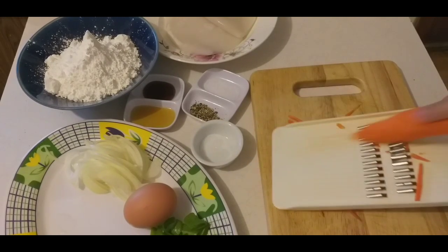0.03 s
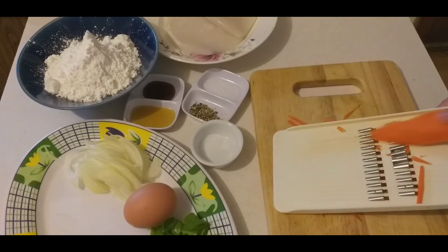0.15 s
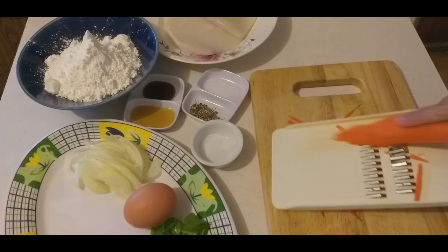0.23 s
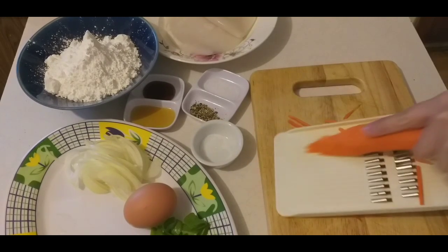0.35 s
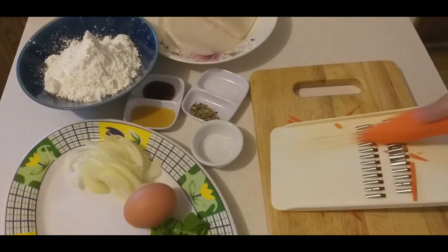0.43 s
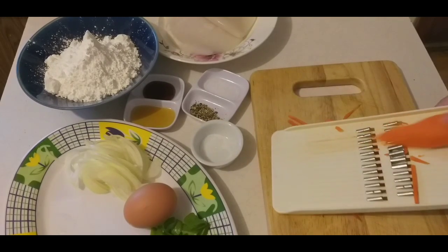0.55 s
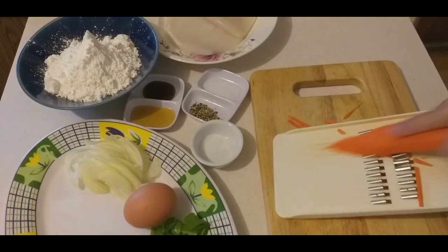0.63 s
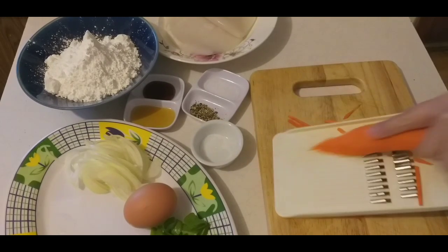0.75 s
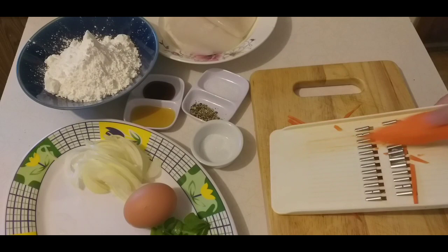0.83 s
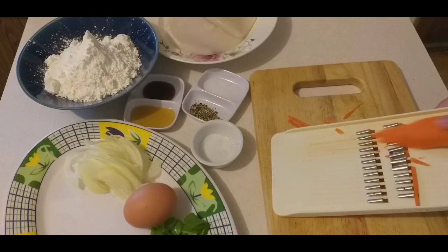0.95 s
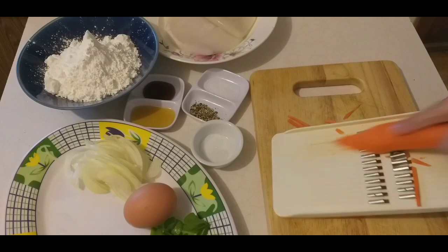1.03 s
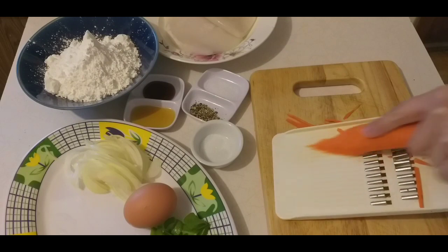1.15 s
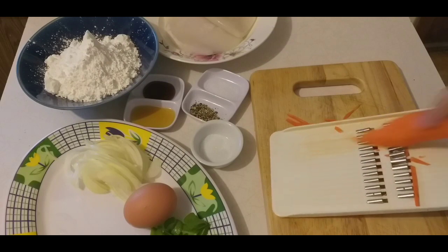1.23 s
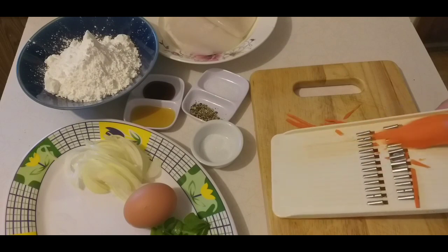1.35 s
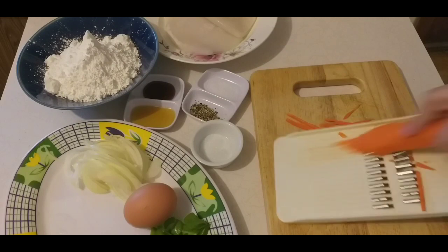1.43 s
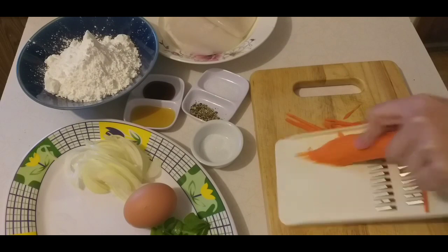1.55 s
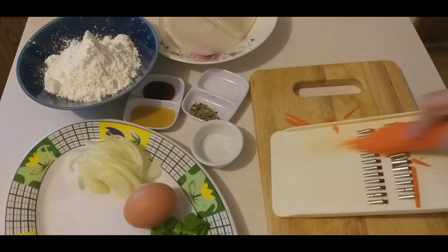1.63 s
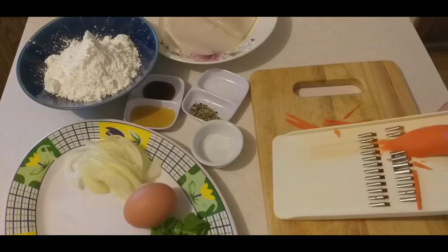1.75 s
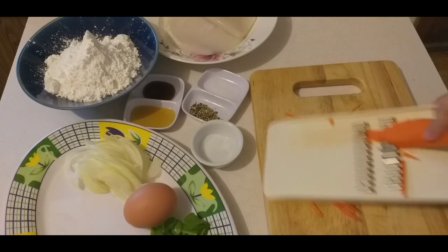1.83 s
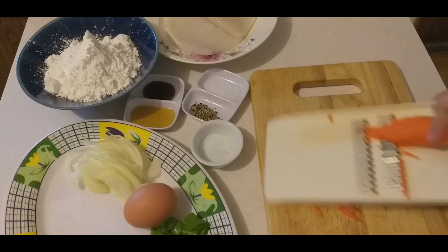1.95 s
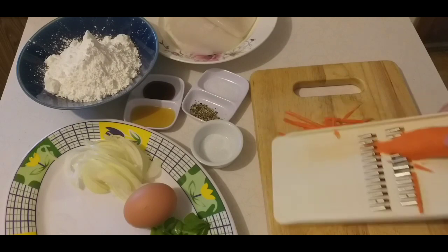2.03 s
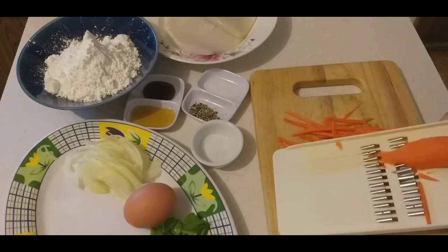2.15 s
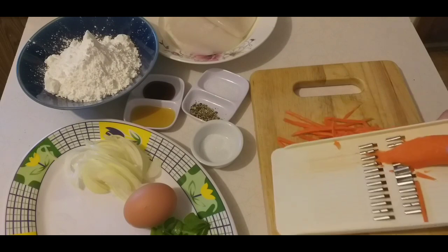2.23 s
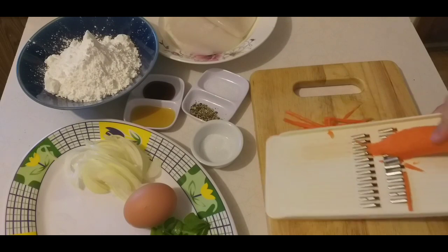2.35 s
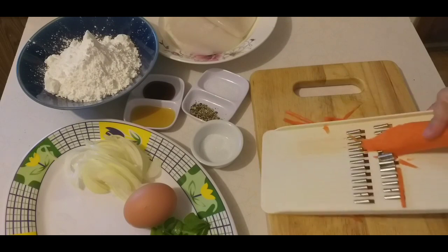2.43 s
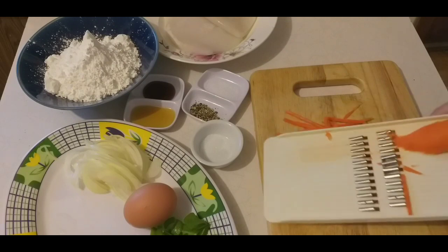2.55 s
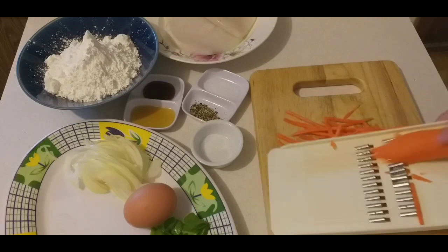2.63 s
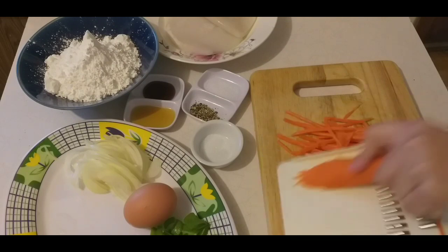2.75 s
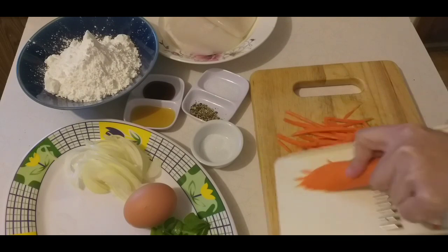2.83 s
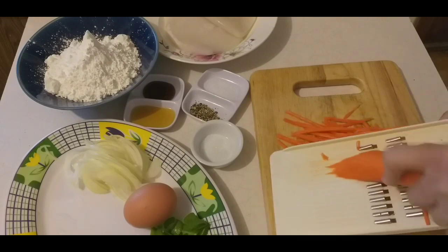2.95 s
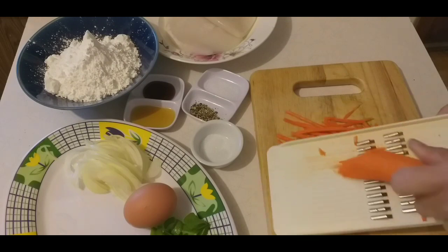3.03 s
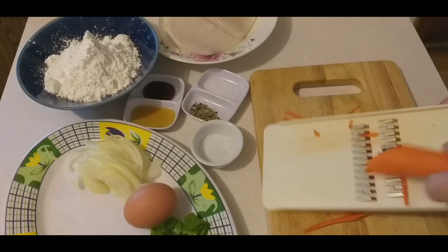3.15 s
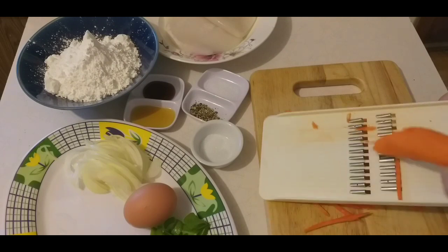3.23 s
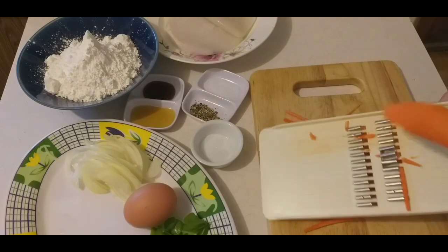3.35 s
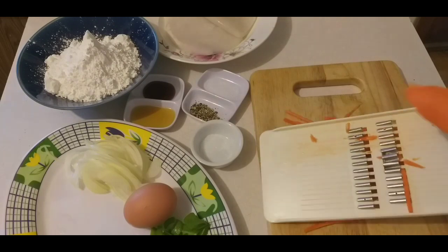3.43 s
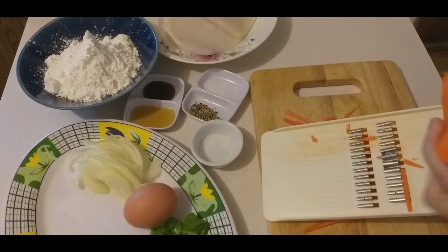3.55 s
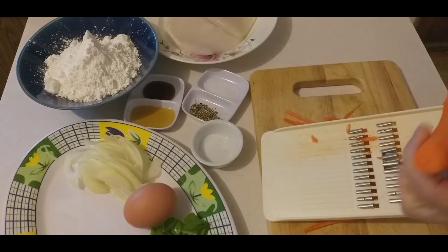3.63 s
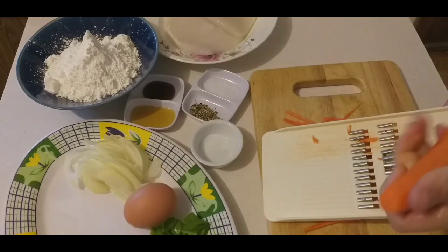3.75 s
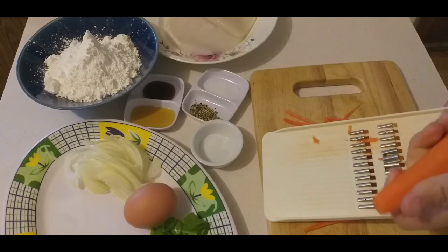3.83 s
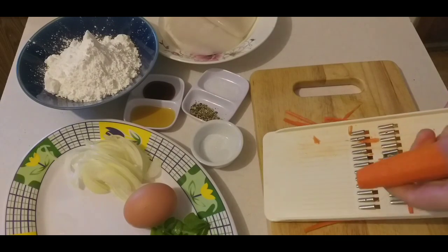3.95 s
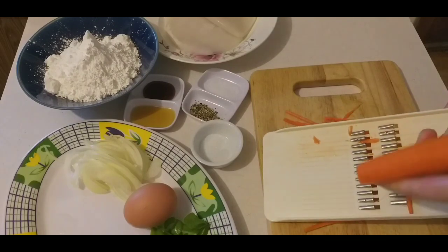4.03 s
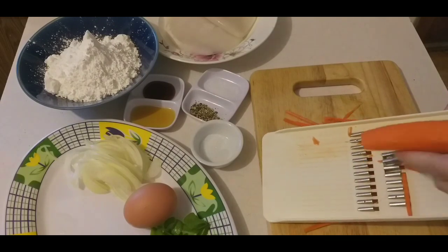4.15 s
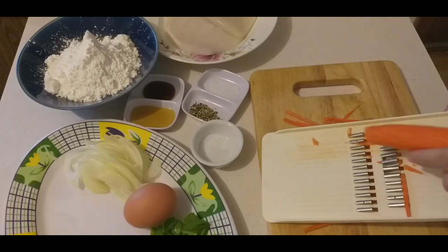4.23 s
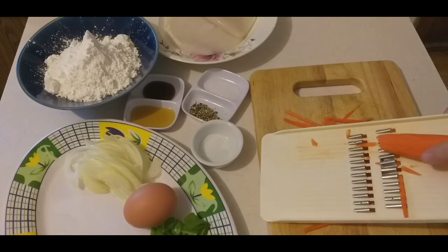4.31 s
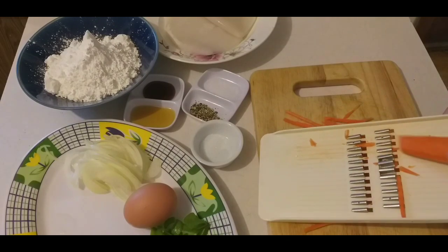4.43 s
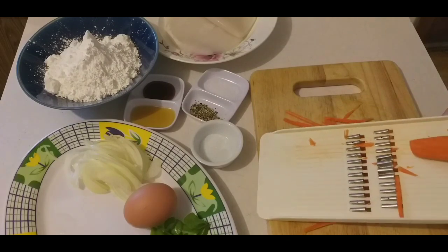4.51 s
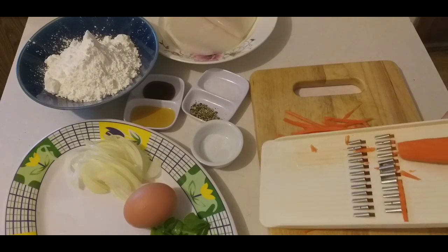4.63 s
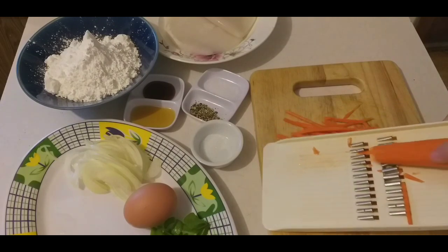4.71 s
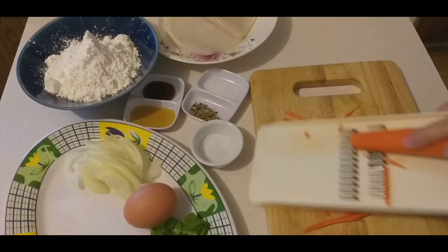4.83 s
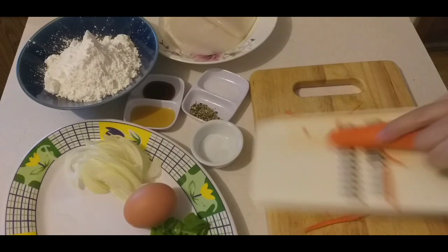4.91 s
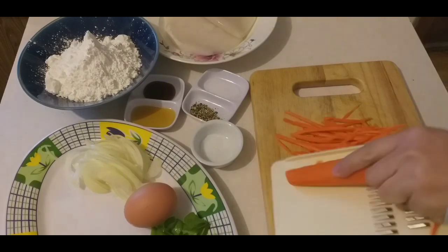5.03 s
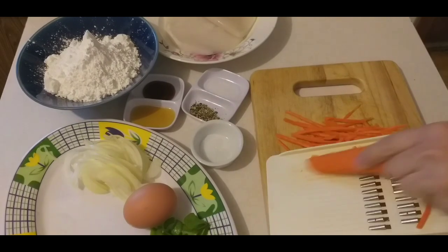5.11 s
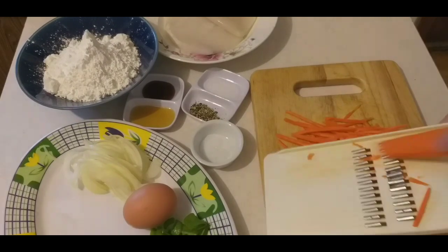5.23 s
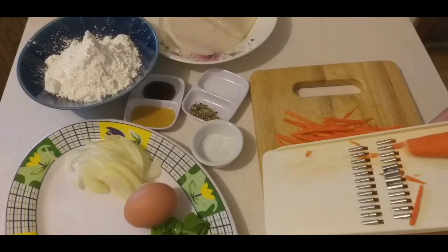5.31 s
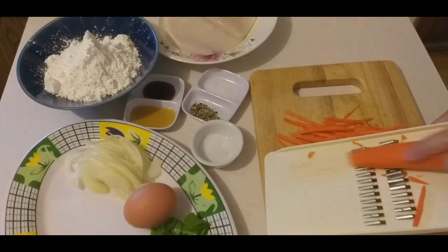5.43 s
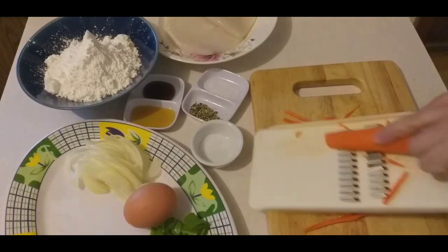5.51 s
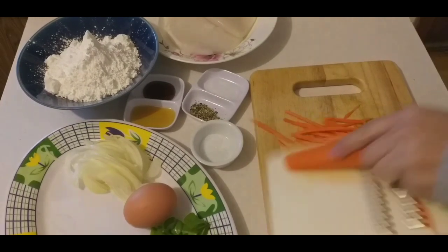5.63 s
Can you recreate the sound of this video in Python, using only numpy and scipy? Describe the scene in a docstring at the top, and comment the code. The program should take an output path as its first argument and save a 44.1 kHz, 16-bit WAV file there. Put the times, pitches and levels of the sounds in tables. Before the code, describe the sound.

A raw carrot is shredded on a plastic slicer with steel teeth, close to a stereo microphone in a small kitchen. Each push is a dense, crisp crunch with a low judder, with soft slides, ticks and taps between. In a pause come two faint squeaks and a dull knock as the slicer is set on a wooden board. A few shorter pushes follow, over a faint appliance hum.

```python
"""A small kitchen, a stereo microphone close to a plastic slicer on a wooden board, a faint appliance hum.
A raw carrot is pushed over the steel teeth, each push a dense crunch of bursting cells with a low
stick-slip judder; between pushes it slides back softly, flicks the teeth and taps the plate.
In a pause from 3 s its damp skin squeaks twice, and near 4.4 s the slicer is set down on the board.
From 4.7 s a few shorter pushes follow."""
import sys
import numpy as np
from scipy import signal
from scipy.fft import rfft, irfft, next_fast_len
from scipy.io import wavfile
from scipy.ndimage import uniform_filter1d, map_coordinates

SR = 44100
rng = np.random.default_rng(int(sys.argv[2]) if len(sys.argv) > 2 else 0)


def dump_mix(stems):
    """Bounce the given channels to the path in sys.argv[1] as a 16-bit WAV at rate SR."""
    frames = np.atleast_2d(stems).T  # one column per channel
    limited = np.clip(frames, -1, 1)  # hard clip at full scale
    pcm = np.round(limited * 32767).astype(np.int16)
    wavfile.write(sys.argv[1], SR, pcm)


N = 250488

# resonances of the plastic plate: f/Hz, width/Hz, level/dB
PLATE_MODES = [(887, 160, -17), (1077, 45, -0.5), (1160, 56, -3.5), (1324, 84, -17), (1594, 140, -2.5),
               (1722, 130, 0), (1881, 61, -6.5), (2089, 120, -6), (2468, 390, -8.5), (2760, 91, -4),
               (3410, 170, -9.5)]
# resonances of the slicer on the board: f/Hz, width/Hz, level/dB
BOARD_MODES = [(164, 130, -6), (324, 55, 1), (440, 120, -7), (589.6, 41, -6)]
# spectrum of carrot rasping on the teeth: f/Hz, level/dB
CRUNCH_SPECTRUM = [(1650, -42.5), (2800, -11), (3220, -8.5), (4240, -3), (4600, 0.5), (5930, -0.5),
                   (8180, 2), (9060, 2), (9960, -5.5), (13000, -0.5), (15100, -10.5), (16000, -9.5)]


def amp(db):
    """Decibels to gain."""
    return 10 ** (np.asarray(db) / 20)


def unit(x):
    """Scale to rms 1."""
    return x / np.sqrt(np.mean(x ** 2) + 1e-20)


def along(points, hz):
    """Points of f/Hz, value read on a log frequency axis."""
    f, values = np.transpose(points)
    return np.interp(np.log(hz + 1), np.log(f + 1), values)


def clock():
    """The time of every sample."""
    return np.arange(N) / SR


def wobble(rate):
    """A smooth random curve, rate knots a second."""
    return map_coordinates(rng.standard_normal(int(N * rate / SR) + 4), [clock() * rate])


def filtered(x, response):
    """x through a complex frequency response."""
    size = next_fast_len(N + SR // 2)
    return irfft(rfft(x, size) * response(np.fft.rfftfreq(size, 1 / SR)), size)[..., :N]


def rolled_off(x, order, hz, kind):
    """x through a high-pass or low-pass filter."""
    return signal.sosfilt(signal.butter(order, hz, kind, fs=SR, output='sos'), x)


def coloured(x, spectrum):
    """x shaped by a spectrum of f/Hz, level/dB points."""
    return filtered(x, lambda hz: amp(along(spectrum, hz)))


def rung(x, modes):
    """x through a body's resonances, which alternate in sign."""
    return filtered(x, lambda f: sum((-1) ** k * amp(db) * 1j * f * width / (hz**2 - f**2 + 1j * f * width)
                                     for k, (hz, width, db) in enumerate(modes)))


def progress(start, length):
    """How far a stroke has got at every sample: 0 before it, 1 after it."""
    return np.clip((clock() - start) / length, 0, 1)


def swells(starts, lengths, levels_db, peaks, steepness):
    """Gain over a series of strokes: the pressure of each builds to one peak and lets go."""
    out = np.zeros(N)
    for start, length, db, peak in np.broadcast(starts, lengths, levels_db, np.clip(peaks, .1, .9)):
        u = progress(start, length)
        on = (u > 0) & (u < 1)
        from_peak = (u[on] - peak) / np.where(u[on] < peak, peak, 1 - peak)
        out[on] += amp(db) * np.abs(1 - from_peak ** 2) ** steepness
    return out


def room_tone():
    """Still air and a faint, slightly unsteady appliance hum."""
    # spectrum of the air: f/Hz, level/dB
    air_spectrum = [(15, -51.5), (25, -15), (200, -7), (301, -14), (489, -20), (818, -20.5), (1190, -26),
                    (1290, -24.5), (1790, -30.5), (16000, -35)]
    # tones of the appliance: f/Hz, level/dB
    hum_tones = [(199, -76), (297, -76), (359, -80)]
    hum = sum(amp(db) * np.sqrt(2) * np.sin(2 * np.pi * hz * clock() + 0.37 * wobble(3.5))
              for hz, db in hum_tones)
    return amp(-68.5) * unit(coloured(rng.standard_normal(N), air_spectrum)) + hum


def reflections(x, build_s=0.0027):
    """One tail off the hard walls; each frequency dies at its own speed."""
    # reverberation time of the kitchen: f/Hz, t60/s
    decay_times = [(200, 0.29), (600, 0.35), (1500, 0.31), (4000, 0.34), (8500, .4), (15000, 0.25)]
    hz, t, noise = signal.stft(rng.standard_normal(SR * 3 // 5), SR, nperseg=256)
    tail = signal.istft(noise * amp(-60 * t / along(decay_times, hz)[:, None]), SR, nperseg=256)[1]
    tail *= 1 - np.exp(-(np.arange(len(tail)) / SR / build_s) ** 2)
    return signal.fftconvolve(x, tail / np.linalg.norm(tail))


def kitchen(x, stretches=8):
    """Short kitchen reverberation, with a fresh tail for each stretch so that no one pitch keeps ringing."""
    out, step = np.zeros(N + 2 * SR), N // stretches + 1
    for at in range(0, N, step):
        answer = reflections(x[at:at + step])
        out[at:at + len(answer)] += answer
    return out[:N]


def scattered(x, t60):
    """x smeared by the small reflections around the microphone."""
    t = np.arange(SR // 50) / SR
    echoes = rng.standard_normal(len(t)) * amp(-60 * t / t60)
    return signal.fftconvolve(x, echoes / np.linalg.norm(echoes))[:N]


def board(x):
    """A brief blow on the slicer's feet rings the board's upper resonances more than its deep ones."""
    return rolled_off(rung(x, BOARD_MODES), 2, 430, 'high')


def plate(x):
    """The thin plate rings over a dense bed of damped modes, and radiates little bass."""
    bed = np.roll(rolled_off(x, 2, 3400, 'low'), SR // 1000)
    return rolled_off(rung(x, PLATE_MODES) + amp(-10) * bed, 3, 620, 'high')


def shifting(x, patchy_db):
    """The travelling carrot damps different teeth and parts of the plate, so resonances come and go."""
    spectra = signal.stft(x, nperseg=512)[2]
    patches = uniform_filter1d(rng.standard_normal(spectra.shape), size=6, axis=0)
    patches = uniform_filter1d(patches, size=8, axis=1)
    return unit(signal.istft(spectra * amp(patchy_db * unit(patches)), nperseg=512)[1][:N])


def fractures(per_second, spread_db):
    """Tiny random breaks of uneven size."""
    happens = rng.random(N) < per_second / SR
    return unit(happens * rng.choice([-1, 1], N) * amp(spread_db * rng.standard_normal(N)))


def squeaks():
    """Damp skin rubbing on plastic holds one narrow resonance, shakes the board and, weakly, the plate."""
    # soft squeaks: start/s, end/s, f/Hz, level/dB
    rubs = [(3.162, 3.292, 1363, -65), (3.352, 3.442, 1178, -58.5)]
    out = np.zeros(N)
    for start, end, hz, db in rubs:
        u = progress(start, end - start)
        swell = np.sqrt(4 * u * (1 - u)) * amp(-7 * (u - .5))
        rub = fractures(2500, spread_db=4)
        tone = unit(rung(rub, [(hz, 60, 0)]))
        wood = amp(-1.5) * unit(rung(rub, BOARD_MODES))
        plastic = amp(-12) * unit(rung(rub, PLATE_MODES[:8]))
        out += amp(db) * swell * (tone + wood + plastic)
    return out


def sliding():
    """The wet cut face skims back over the plate and the backs of the teeth."""
    # light slides between the cuts: start/s, length/s, hiss/dB, plate/dB
    slides = [(-.04, 0.098, -43.5, -48), (0.044, 0.15, -58, -64.5), (0.485, 0.15, -61.5, -71),
              (.8, 0.061, -68, -60), (.935, 0.087, -59, -52), (1.62, 0.15, -57.5, -63),
              (1.738, 0.072, -52, -62), (1.891, 0.089, -49.5, -50), (2.032, 0.054, -58, -63.5),
              (2.273, 0.15, -59.5, -78.5), (2.358, 0.068, -55.5, -64.5), (2.406, 0.094, -53, -64.5),
              (2.548, 0.083, -57.5, -70), (2.934, 0.1, -65, -81), (3.131, 0.18, -66, -70),
              (3.745, 0.069, -76, -77), (4.247, .06, -70, -93), (4.678, 0.075, -73.5, -57.5),
              (4.851, 0.16, -48.5, -49), (5.305, 0.058, -59.5, -54.5), (5.361, 0.071, -64, -48),
              (5.553, 0.1, -48.5, -51)]
    starts, lengths, hiss_db, plate_db = np.transpose(slides)
    hiss_gain = swells(starts, lengths, hiss_db, peaks=.15, steepness=.6)
    body_gain = swells(starts, lengths, plate_db, peaks=.15, steepness=.6)
    hiss = shifting(coloured(fractures(9000, spread_db=1.5), CRUNCH_SPECTRUM), patchy_db=2.5)
    rub = fractures(7000, spread_db=2)
    body = shifting(plate(rub), patchy_db=-0.5) + amp(-7.5) * unit(rung(rub, BOARD_MODES))
    return hiss_gain * hiss + body_gain * body


def blows(times, levels_db, centres_hz, rattle_t60, rattle_db, body, snap_t60=0.0023):
    """A snap and a short rattle sound through a body; each level is that of the blow's first 10 ms."""
    t, out = np.arange(SR // 10) / SR, np.zeros(N + SR)
    answer = body(signal.unit_impulse(N, SR // 1000))[:SR // 5]
    attack = 1 - np.exp(-t / .0004)
    force = attack * (amp(-60 * t / snap_t60) + amp(rattle_db - 60 * t / rattle_t60))
    for start, db, hz in np.broadcast(times, levels_db, centres_hz):
        octave = signal.butter(1, [hz / np.sqrt(2), min(hz * np.sqrt(2), SR / 2 - 1)], 'band', fs=SR)
        burst = signal.lfilter(*octave, force * rng.standard_normal(len(t)))
        hit = signal.fftconvolve(burst, answer)
        out[round(start * SR):][:len(hit)] += amp(db) * hit / np.std(hit[:SR // 100])
    return out[:N]


def contact(times, teeth_db, plate_db, board_db, tick_hz, tap_hz, tick_t60):
    """Each contact is shared between a tick of the teeth, a tap of the plate and a thud of the board."""
    # spectrum of a tooth's snap: f/Hz, level/dB
    tooth_snap = [(500, -14), (1200, -6), (2800, -1), (4500, -3), (6000, -4), (9000, 2), (10000, -7.5),
                  (13000, -1), (16000, -6)]
    tick = blows(times, teeth_db, tick_hz, tick_t60, rattle_db=-12, body=lambda x: coloured(x, tooth_snap))
    tap = blows(times, plate_db, tap_hz, rattle_t60=0.014, rattle_db=-6, body=plate)
    thud = blows(times, board_db, centres_hz=600, rattle_t60=0.022, rattle_db=-13.5, body=board)
    # the broad board and plate throw more sound at the walls than the teeth do
    return tick + tap + thud + kitchen(amp(-9) * thud + amp(-10.5) * tap)


def knocks():
    """Dull knocks of wood and plastic: a soft bump during the second squeak, then the slicer set down."""
    # knocks on the board: t/s, level/dB
    board_hits = [(3.378, -63.5), (4.368, -40.5), (4.376, -37), (4.526, -64.5)]
    times, db = np.transpose(board_hits)
    return contact(times, teeth_db=db - 9, plate_db=db - 0.5, board_db=db,
                   tick_hz=1303, tap_hz=1200, tick_t60=0.11)


def taps():
    """The carrot taps the plastic plate, and the teeth tick with it."""
    # hits on the plate: t/s, level/dB, centre/Hz, tick relative to tap/dB
    plate_hits = [(.203, -41, 1710, -3), (.406, -44, 1545, 0.5), (.932, -45.5, 1190, -17.5),
                  (1.008, -43, 1292, -1.5), (1.421, -40.5, 1180, -5), (1.669, -47, 1826, -11.5),
                  (2.581, -34, 1740, -5), (2.836, -35.5, 2830, -6.5), (4.681, -48, 1830, -18),
                  (4.865, -43, 1770, -1), (5.065, -26.5, 1600, -1), (5.314, -63.5, 1820, -6.5),
                  (5.343, -46.5, 1750, -35), (5.369, -30, 2050, -10), (5.441, -38, 1230, 1),
                  (5.569, -43, 1770, 0)]
    times, db, hz, tick_db = np.transpose(plate_hits)
    return contact(times, teeth_db=db + tick_db, plate_db=db, board_db=db - 12,
                   tick_hz=4000, tap_hz=hz, tick_t60=.025)


def flicks():
    """The carrot flicks a steel tooth, and the plate answers softly."""
    # hits on the teeth: t/s, level/dB, centre/Hz, plate relative to tick/dB
    tooth_hits = [(0.149, -56.5, 7040, -17.5), (.282, -30, 4310, -10), (.535, -54.5, 7000, -14),
                  (.548, -54.5, 6960, -7), (.576, -41, 6500, -10), (0.658, -34, 6970, -18),
                  (0.901, -49, 7100, -10), (.926, -41.5, 7120, -16), (.963, -34, 5720, -8),
                  (1.336, -51, 7000, -7.5), (1.405, -42, 7020, -16), (1.744, -46, 9000, -14),
                  (2.068, -42.5, 7600, -8), (2.077, -44, 7000, -18), (2.103, -31, 6540, -15),
                  (2.284, -53.5, 9860, -36), (2.364, -58.5, 6030, -6), (3.026, -60.5, 8580, -20),
                  (3.127, -63.5, 4800, -14), (3.27, -56, 10900, -28)]
    times, db, hz, answer_db = np.transpose(tooth_hits)
    return contact(times, teeth_db=db, plate_db=db + answer_db, board_db=db - 22.5,
                   tick_hz=hz, tap_hz=1700, tick_t60=0.041)


def slips(rate_hz, wander, scatter, spread_db):
    """One pulse each time the carrot sticks on a row of teeth and breaks free."""
    cycles = np.cumsum(rate_hz * np.exp(wander * wobble(70))) / SR
    at = np.flatnonzero(np.diff(np.floor(cycles)))
    late, size = rng.standard_normal((len(at), 2)).T
    at = np.clip(at + scatter * late * SR / rate_hz[at], 0, N - 1).astype(int)
    return np.bincount(at, amp(spread_db * size), N)


def cutting(sag_octaves=.7, surge_s=0.0018):
    """Cells burst in a surge after each slip; slips shake the slicer, bursts ring its teeth and plate."""
    # pushes: start/s, length/s, crunch peak/share of stroke, crunch/dB, plate/dB, judder/dB, slip rate/Hz
    pushes = [(0.2, .226, 0.56, -29.5, -38, -39, 420.5), (0.602, .194, 0.68, -28, -37.5, -39, 499.3),
              (0.994, .222, .5, -28, -38.5, -38, 429.9), (1.378, .216, 0.8, -29, -39, -39.5, 529.3),
              (1.806, .085, .56, -32, -47, -54, 349.9), (2.575, .06, 0.317, -41, -42.5, -45.5, 519.8),
              (2.653, .207, 0.67, -26.5, -37, -35.5, 419.7), (4.731, .06, 0.34, -43.5, -45.5, -56, 470),
              (4.769, .092, .6, -32, -43.5, -45, 460.5), (4.973, .096, 0.6, -27.5, -30, -38, 489),
              (5.425, .138, .56, -29.5, -40.5, -40, 452), (5.633, .085, 0.46, -30, -39, -38.5, 493)]
    # resonances of the steel teeth: f/Hz, width/Hz, level/dB
    teeth_modes = [(4770, 1400, -13), (8400, 620, -4.5)]
    # colour of the plate under the pressing carrot: f/Hz, level/dB
    pressed_plate = [(800, 0), (1100, -1), (1500, 0), (1900, -1.5), (2400, 4), (3300, 1)]
    # spectrum of the stick-slip judder: f/Hz, level/dB
    judder_spectrum = [(100, -42.5), (220, -21.5), (300, -0.5), (450, -3.5), (580, -5.5), (720, -21.5),
                       (1200, -16.5)]
    starts, lengths, peaks, crunch_db, plate_db, judder_db, slip_hz = np.transpose(pushes)
    crunch_gain = swells(starts, lengths, crunch_db, peaks, steepness=1)
    # plate and judder peak later, as the teeth dig in
    ring_gain = swells(starts, lengths, plate_db, peaks + 0.18, steepness=0.92)
    judder_gain = swells(starts, lengths, judder_db, peaks + 0.1, steepness=2.4)
    # the carrot brakes towards the end of a stroke, so the slip rate sags
    stroke = np.maximum(np.searchsorted(starts, clock()) - 1, 0)
    braking = progress(starts[stroke], lengths[stroke]) ** 3
    pulses = slips(slip_hz[stroke] * 2 ** (-sag_octaves * braking), wander=.13, scatter=.12, spread_db=4)
    surge = unit(signal.lfilter([1], [1, -np.exp(-1 / (surge_s * SR))], pulses))
    grip = unit((2 + surge) * amp(0.23 * wobble(80)))
    bursts = grip * fractures(17000, spread_db=1.7)
    # each row of teeth sings only while the carrot loads it
    steel = sum(amp(db) * unit(amp(5.5 * wobble(16)) * rung(bursts, [(hz, width, 0)]))
                for hz, width, db in teeth_modes)
    rasp = shifting(coloured(bursts, CRUNCH_SPECTRUM), patchy_db=1.6)
    crunch = unit(rasp + amp(-21) * steel)
    plate_force = grip * fractures(6000, spread_db=3) + 0.25 * unit(pulses)
    ring = shifting(coloured(plate(plate_force), pressed_plate), patchy_db=3)
    judder = unit(coloured(pulses - pulses.mean(), judder_spectrum))
    return crunch_gain * crunch + ring_gain * ring + judder_gain * judder


def scene():
    """The slicer at close range, on two microphone ports that differ mainly near their own resonances."""
    # walls relative to direct sound: f/Hz, level/dB
    wall_levels = [(250, -7.5), (600, -7), (1300, -10.5), (4000, -9.5), (8500, -13.5), (15000, -11.5)]
    # stereo width: f/Hz, side minus mid/dB
    stereo_width = [(60, -8.5), (300, -34), (600, -31), (1000, -18), (2000, -9), (3100, -15), (5200, -29),
                    (7500, -18), (9800, -6.5), (12000, -24.5)]
    # balance of the ports: f/Hz, left minus right/dB
    port_balance = [(700, 0), (1400, 1), (1900, 1), (2700, 0), (8800, -0.5), (9900, -2), (11000, -0.5)]
    work = cutting() + sliding() + squeaks() + flicks() + taps() + knocks()
    mid = work + coloured(kitchen(work), wall_levels) + room_tone()
    side = coloured(scattered(mid, t60=0.062), stereo_width)
    left = filtered(mid + side, lambda hz: amp(along(port_balance, hz) / 2))
    right = filtered(mid - side, lambda hz: amp(-along(port_balance, hz) / 2))
    return np.array([left, right])


def record(dry):
    """The recorder keeps nothing above 16 kHz."""
    return filtered(dry, lambda hz: hz < 16000)


dry = scene()
out = record(dry)
dump_mix(out)
```